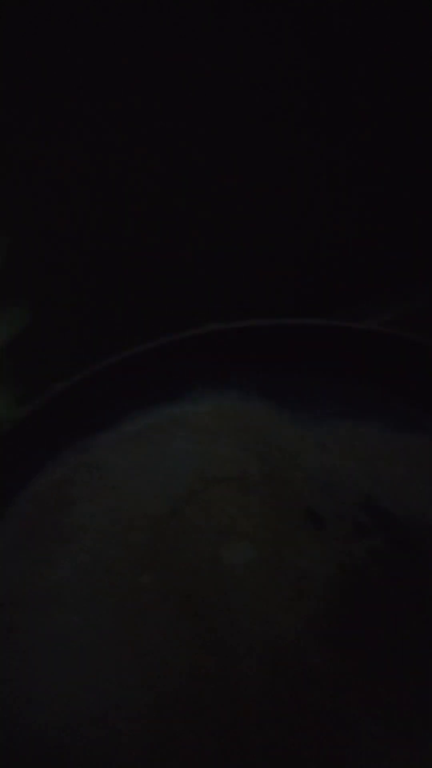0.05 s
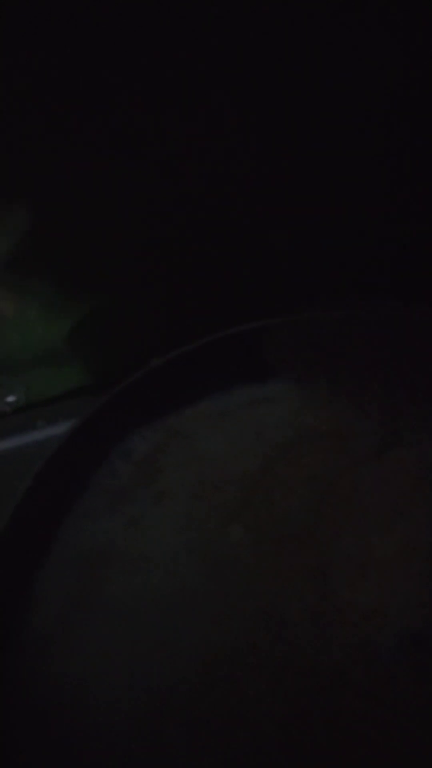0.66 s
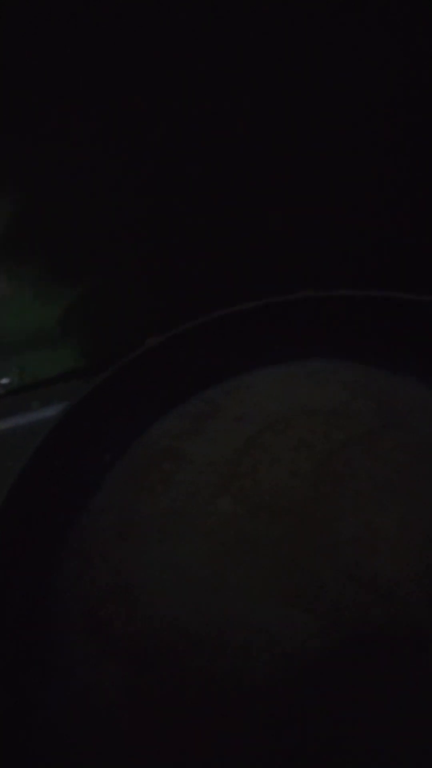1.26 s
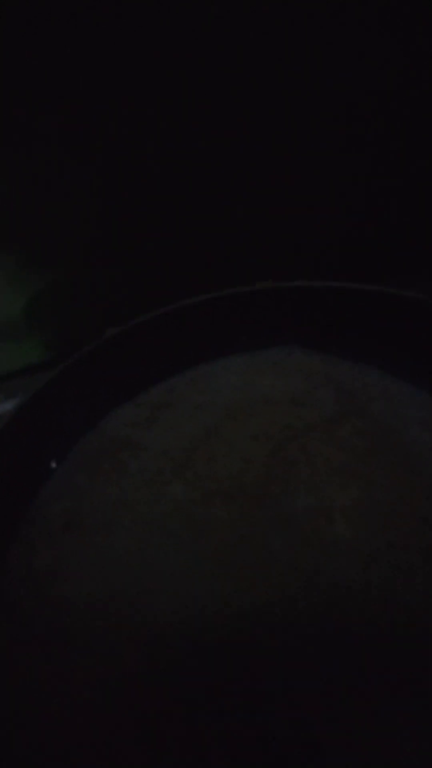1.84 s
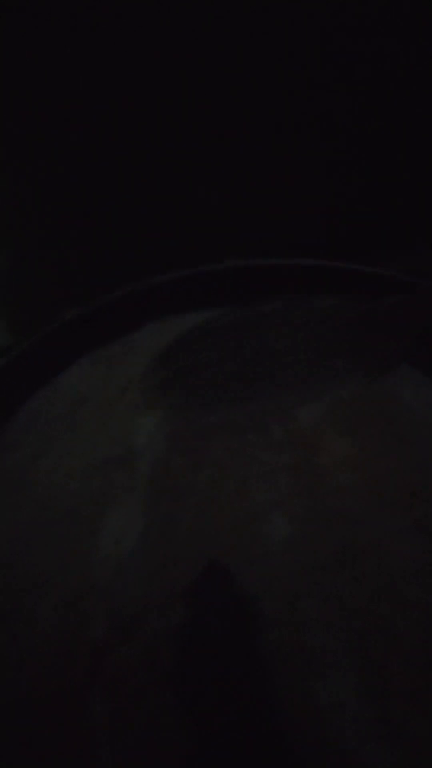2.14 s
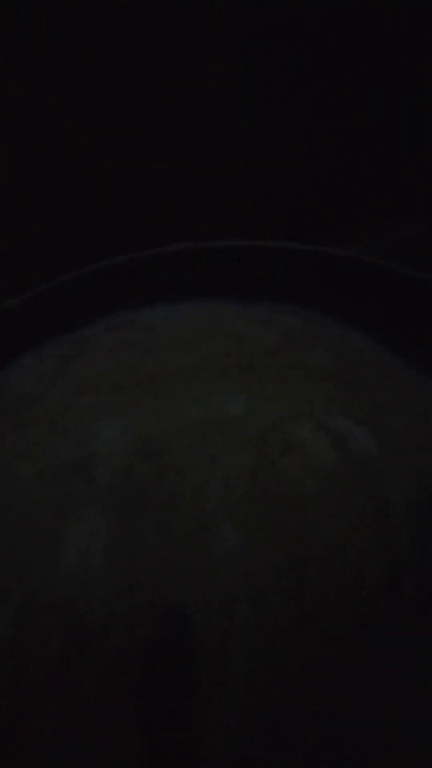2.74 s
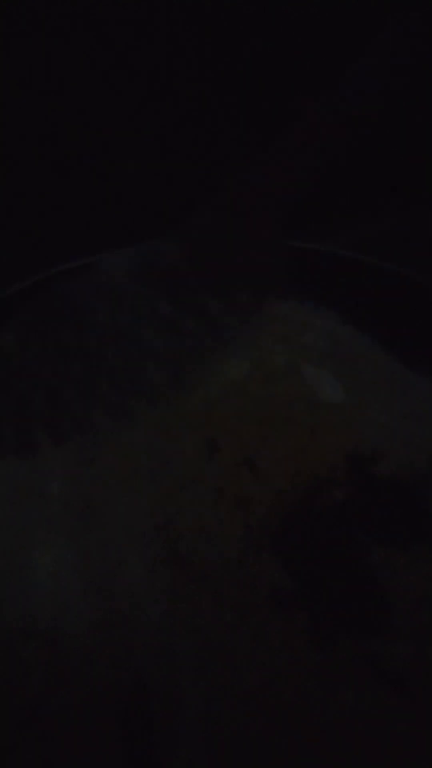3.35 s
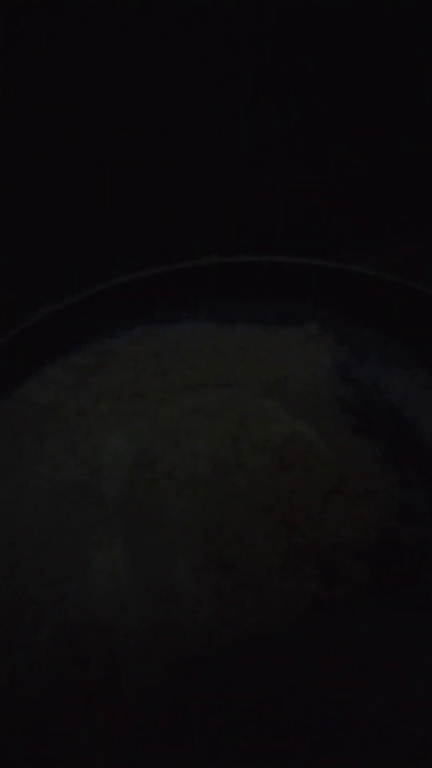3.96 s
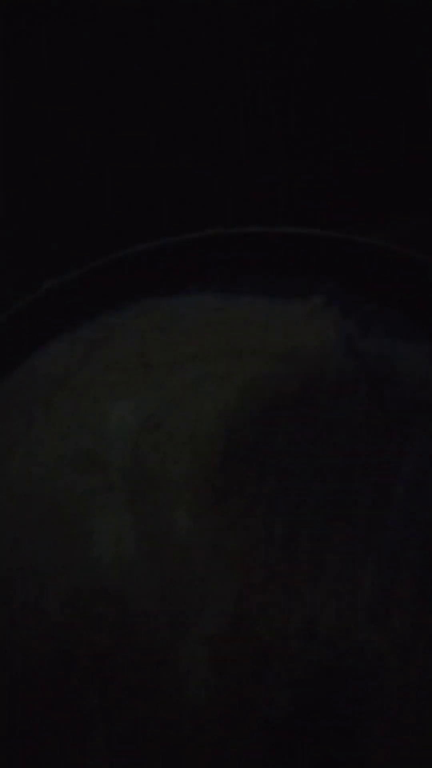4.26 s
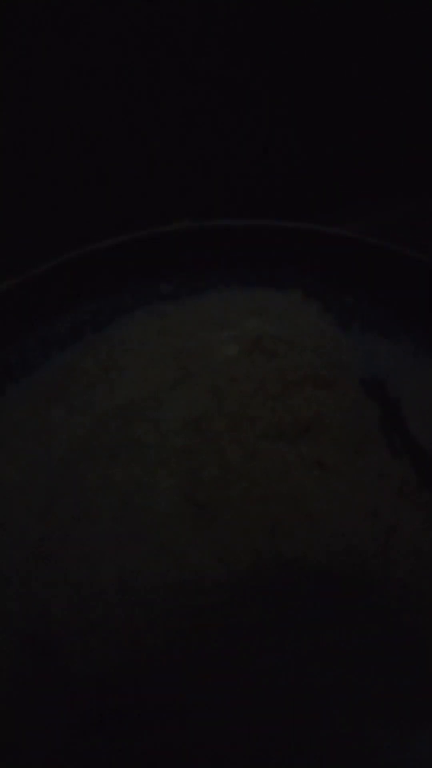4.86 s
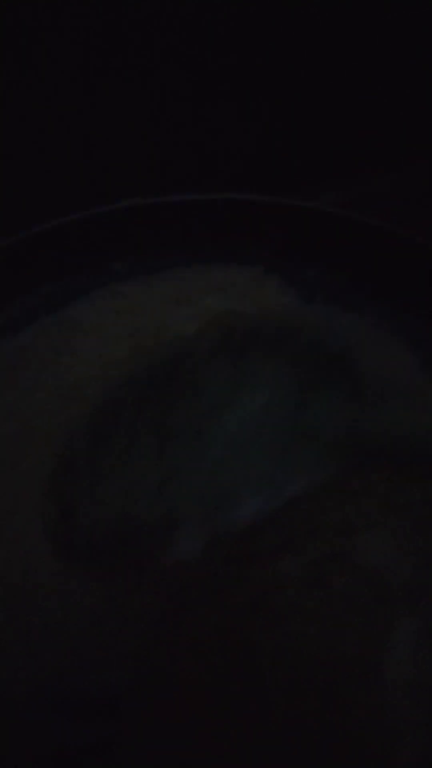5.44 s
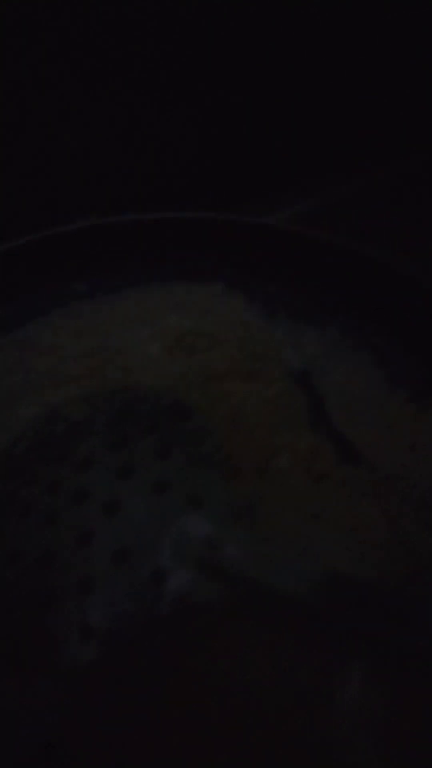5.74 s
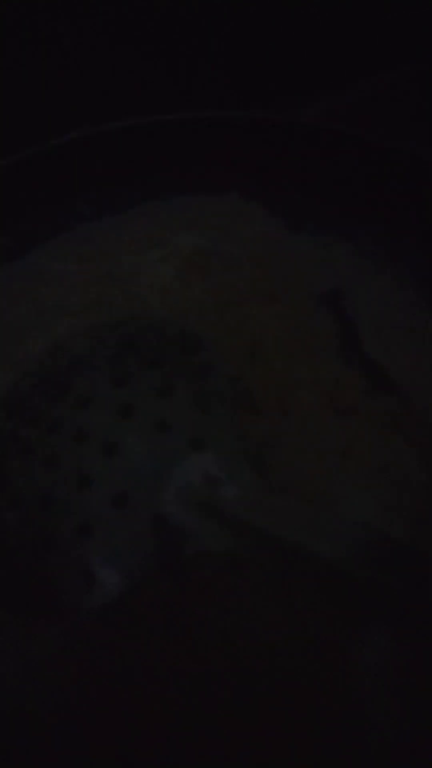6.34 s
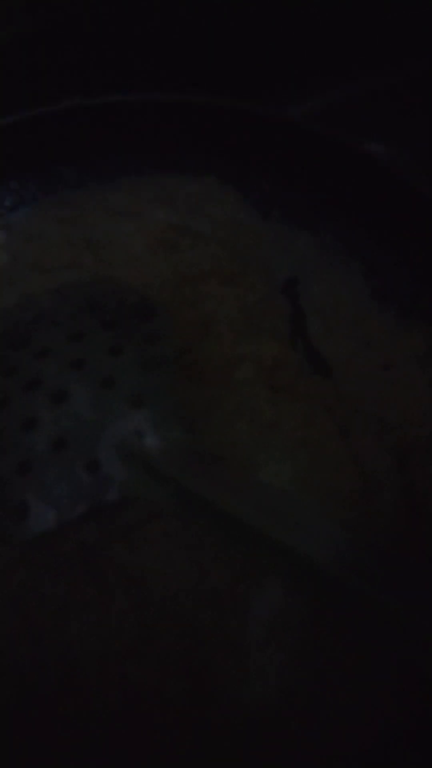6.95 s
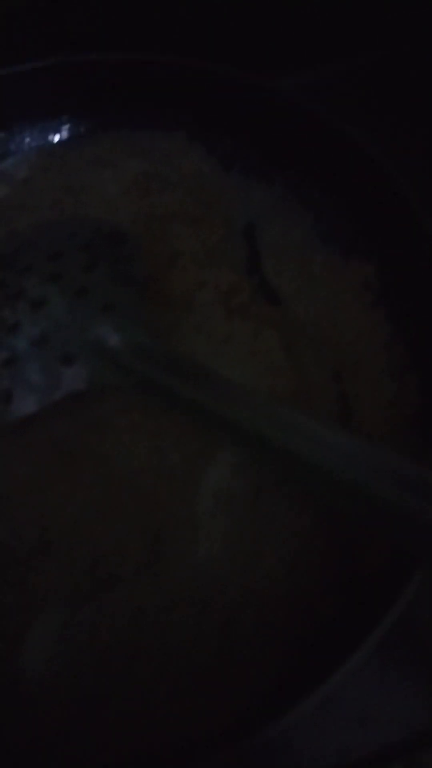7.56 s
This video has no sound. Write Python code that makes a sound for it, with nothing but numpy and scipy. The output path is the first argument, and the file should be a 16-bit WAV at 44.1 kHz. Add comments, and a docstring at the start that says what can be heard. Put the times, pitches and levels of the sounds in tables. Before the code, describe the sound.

Wet mash sizzles in a hot, heavy pan as a metal ladle knocks and scrapes through it, making the pan ring briefly. The hiss flares up several times as the mash is turned, and the pan now and then rumbles on the stove. Near the end a few drops spit, the stirring stops and the sizzle thins to a faint crackle. Heard from close by in a small kitchen.

```python
"""Milk poured onto roasted grain sizzles in a hot, heavy pan in a small kitchen, heard from close by.
From the start a metal ladle knocks and scrapes through the mash, setting the pan ringing, and now and
then the pushed pan rumbles on the stove. Five times in the first five seconds, wet mash is turned onto
hot metal and the sizzle of bursting bubbles flares up. Then the milk soaks in, a few drops spit,
the stirring dies down and the sizzle thins to a crackle."""
import sys
import numpy as np
from scipy import signal
from scipy.fft import rfft, irfft, next_fast_len
from scipy.io import wavfile
from scipy.ndimage import uniform_filter1d, map_coordinates

SR = 44100
rng = np.random.default_rng(int(sys.argv[2]) if len(sys.argv) > 2 else 0)


def digitize_waveform(pressure):
    """Quantize a signal to 16-bit integers and store it at the path in sys.argv[1].

    Rows of a 2-D input are taken as channels; values are limited to [-1, 1].
    """
    field = np.atleast_2d(pressure).T
    bounded = np.clip(field, -1, 1)
    quanta = np.round(bounded * 32767).astype(np.int16)
    wavfile.write(sys.argv[1], SR, quanta)


N = 339570
TIME = np.arange(N) / SR


def from_db(db):
    """Turn decibels into a number to multiply by."""
    return 10 ** (np.asarray(db) / 20)


def unit_power(x):
    """Scale a signal to an average power of 1."""
    return x / np.sqrt(np.mean(x ** 2) + 1e-20)


def fade(t, t60):
    """A dying curve; t60, the ring time, is the seconds it takes to fall by 60 dB."""
    return from_db(-60 * t / t60)


def clicks(times, heights):
    """One click at each of the given times."""
    return np.bincount(np.clip(np.round(times * SR).astype(int), 0, N - 1), heights, N)


def drift(turns_per_s):
    """A random wobble, about 1 in size."""
    points = rng.standard_normal(2048)
    return unit_power(map_coordinates(points, [TIME * turns_per_s], order=1, mode="wrap"))


def colour(x, spectrum):
    """Give a sound the tone colour set out in rows of frequency and level."""
    size = next_fast_len(N + 8192)
    hz, db = np.transpose(spectrum)
    log_hz = np.log(np.fft.rfftfreq(size, 1 / SR) + 1)
    gain = unit_power(from_db(np.interp(log_hz, np.log(hz), db)))
    # folding the cepstrum makes the filter ring only after a click, never before it
    cepstrum = irfft(np.log(gain), size)
    cepstrum[1:size // 2] *= 2
    cepstrum[size // 2 + 1:] = 0
    return irfft(rfft(x, size) * np.exp(rfft(cepstrum)), size)[:N]


def ring(x, hz, t60):
    """Each click in x sets one fading tone ringing."""
    decay, step = fade(1 / SR, t60), 2 * np.pi * hz / SR
    return signal.lfilter([.5, 0, -.5], [1, -2 * decay * np.cos(step), decay ** 2], x + 1e-18)


def crackle(per_s, spread_db):
    """Random clicks of uneven size, with the same power whether few or many."""
    chance = np.clip(per_s / SR, 1e-5, 1)
    sizes = from_db(spread_db * np.minimum(rng.exponential(1, N), 5))
    signs = rng.choice([-1, 1], N)
    return unit_power(sizes * signs * (rng.random(N) < chance) / np.sqrt(chance))


def burst(t60):
    """A short, dying puff of noise with a total energy of 1."""
    t = TIME[:SR // 10]
    noise = rng.standard_normal(len(t)) * fade(t, t60)
    return noise / np.linalg.norm(noise)


# The tone colour of the quiet kitchen. Each row: frequency in Hz, relative level in dB.
HUM_COLOUR = [(30, -9), (65, -26), (85, 6), (110, 5), (140, 6.5), (230, -1), (600, -7), (1500, -1.5),
              (3000, -11), (12000, -29)]

def room_hum(level_db=-58.0):
    """A faint, low, steady noise lies under everything."""
    return from_db(level_db) * colour(rng.standard_normal(N), HUM_COLOUR)


def kitchen_echo(x, echo_db=-6.5, t60=0.36, first_wall_s=0.0033, dull_hz=4500):
    """Hard walls close by add a dense, dulled echo to a sound."""
    t = TIME[:SR]
    tail = rng.standard_normal(SR) * fade(t, t60) * (t > first_wall_s)
    tail = signal.sosfilt(signal.butter(1, dull_hz, fs=SR, output="sos"), tail / np.linalg.norm(tail))
    return x + from_db(echo_db) * signal.oaconvolve(x, tail)[:N]


# The deep tones of the pan on its stand. Each row: pitch in Hz, relative level in dB, ring time in seconds.
STAND_TONES = [(85.8, -7, 0.13), (102.7, -2, 0.4), (154.5, -3.5, 0.27), (185.2, -8, 0.16),
               (201, -3.5, 0.71)]
# The pan shakes. Each row: start in seconds, length in seconds, relative level of the first bump in dB.
JUDDERS = [(1.238, .02, -42), (1.396, .17, -30.5), (2.412, .04, -49), (3.15, .13, -37.5),
           (5.561, .02, -45.5), (5.765, .04, -48)]

def pan_rumble(level_db=-4.0, bumps_per_s=34, fade_db_per_s=46, uneven=0.175, band_hz=(60, 300)):
    """Pushed by the ladle, the pan judders on its stand in a fading run of soft, low bumps."""
    bumps = np.zeros(N)
    for s, length, db in JUDDERS:
        gaps = np.exp(uneven * rng.standard_normal(12)) / bumps_per_s
        age = np.cumsum(gaps) - gaps[0]
        bumps += clicks(s + age, (age < length) * from_db(db + level_db - fade_db_per_s * age))
    push = signal.sosfilt(signal.butter(2, band_hz, "band", fs=SR, output="sos"), bumps)
    return sum(from_db(db) * ring(push, hz, t60) for hz, db, t60 in STAND_TONES)


# The ladle hits the pan. Each row: start in seconds, relative levels in dB of the low tones,
# the high tones and the metal tick, then the favoured pitch in Hz.
KNOCKS = [(.212, -36.5, -38, -65, 436), (.464, -18.5, -17.5, -35.5, 1330), (.809, -17, -18, -29.5, 574),
          (.816, -30, -22.5, -53, 1460), (1.232, -24, -19.5, -40, 780), (1.786, -28.5, -42, -58, 360),
          (1.889, -64, -30.5, -44, 2423), (2.213, -22.5, -24, -39.5, 1254), (2.427, -28, -35, -40.5, 1170),
          (2.485, -29, -28, -43, 1570), (2.564, -25, -27.5, -67, 1266), (3.302, -24, -27, -54, 1270),
          (3.619, -19.5, -18, -35.5, 1226), (3.877, -27.5, -26.5, -58, 574), (4.201, -24, -25, -34, 1640),
          (4.611, -19, -17.5, -37.5, 1410), (4.766, -30, -28.5, -62, 562), (4.86, -45, -37, -59, 1490),
          (5.559, -20, -16.5, -27, 1107), (5.751, -31, -23, -29, 1503), (5.788, -26, -31.5, -62, 1390),
          (7.538, -66, -50.5, -73, 1410)]
# The pan rocks on its stand with a dull bump. Each row: start in seconds, relative level in dB.
ROCKS = [(5.077, -31.5), (5.243, -45), (5.771, -26.5), (5.859, -29.5), (5.915, -33), (6.009, -40),
         (6.087, -40.5)]

def touches(rock_hz=510, bounce_s=0.054, bounce_db=-16.5):
    """List the ladle's knocks, one soft bounce after each, and the pan's rocks, in rows like KNOCKS."""
    rocks = [(s, db, db - 9, db - 29, rock_hz) for s, db in ROCKS]   # mostly low tones
    bounces = [(s + bounce_s, low + bounce_db, high + bounce_db, tick - 39, hz)   # hardly any tick
               for s, low, high, tick, hz in KNOCKS]
    return list(KNOCKS) + rocks + bounces


def favour(hz, favoured_hz, cut_db, octaves):
    """The spot that is touched drives tones near one pitch fully, and the others up to cut_db less."""
    nearness = np.exp(-.5 * (np.log2(hz / favoured_hz) / octaves) ** 2)
    return from_db(cut_db * (nearness - 1))


# The tones of the filled pan. Each row: pitch in Hz, relative level in dB, ring time in seconds.
PAN_TONES = [(316, -2, 0.037), (360, -1, 0.12), (468.6, -2, 0.1), (510, 2, 0.053), (571, -0.5, 0.093),
             (659.6, -8.5, 0.3), (751.7, -6.5, 0.17), (846, -10.5, 0.14), (1079, -4.5, 0.095),
             (1184, -7.5, 0.11), (1281, -1, 0.047), (1380, 5.5, 0.023), (1378, 0, 0.036), (1538, -9, 0.069),
             (1580, 0, 0.041), (1702, -4, 0.031), (1828, -2, 0.032), (2170, -13, 0.036), (2420, -13, 0.051),
             (2900, -12, 0.042), (3656, -12, 0.067)]
LOW_TONES_BELOW_HZ = 930   # low tones come from the pan's bottom, high ones from its wall
# The tone colour of metal ticking on metal. Each row: frequency in Hz, relative level in dB.
TICK_COLOUR = [(600, 1), (1500, 3), (2800, 9), (4300, -3.5), (5600, -3), (7200, 2), (9000, 8),
               (11500, -2.5), (16000, -14)]

def pan_knocks(low_db=-1.5, high_db=-2.5, tick_db=26.0, vary_db=2.5, detune=0.042, dull_hz=3600):
    """Each touch lands on a new spot and rings the pan a little differently; bare metal adds a tick."""
    hz, db, t60 = np.transpose(PAN_TONES)[:, :, None]
    is_low = hz < LOW_TONES_BELOW_HZ
    # neighbouring low tones swing against each other, so the ring swells without a thud
    side = np.where(is_low, (-1) ** np.arange(len(hz))[:, None], 1)
    t, ringing = TIME[:SR // 5], np.zeros(N + SR)
    for s, low, high, _, favoured_hz in touches():
        level_luck, pitch_luck, phase_luck = rng.standard_normal((3, len(hz), 1))
        force_db = np.where(is_low, low + low_db, high + high_db)
        height = from_db(force_db + db + vary_db * level_luck)
        height *= favour(hz, favoured_hz, cut_db=6.0, octaves=0.22)
        swing = side * np.sin(2 * np.pi * hz * (1 + detune * pitch_luck) * t + .5 * phase_luck)
        start = int((s + 0.001028) * SR)   # the heavy wall answers just after the tick
        ringing[start:start + len(t)] += np.sum(height * swing * fade(t, t60), axis=0)
    body = signal.sosfilt(signal.butter(2, dull_hz, fs=SR, output="sos"), ringing[:N])
    starts, _, _, tick, _ = np.transpose(touches())
    ticks = signal.oaconvolve(clicks(starts, from_db(tick + tick_db)), burst(t60=0.023))[:N]
    return body + colour(ticks, TICK_COLOUR)


# The tones of the ladle's steel bowl. Each row: pitch in Hz, relative level in dB, ring time in seconds.
LADLE_TONES = [(2190, -5, 0.067), (3460, -8.5, 0.078), (4340, 1.5, 0.031), (5060, -30, 0.01)]

def ladle_ring(clink_db=-0.5, vary_db=2.0, detune=0.063, song_db=2.5, song_t60=0.041):
    """The bowl clinks differently at each touch and, pressed to the pan, sings at the favoured pitch."""
    hz, db, t60 = np.transpose(LADLE_TONES)[:, :, None]
    t, ringing = TIME[:SR // 5], np.zeros(N + SR)
    for s, low, high, tick, favoured_hz in touches():
        pitch_luck, level_luck = rng.standard_normal((2, len(hz), 1))
        swing = np.sin(2 * np.pi * hz * (1 + detune * pitch_luck) * t) * fade(t, t60)
        clink = np.sum(from_db(tick + clink_db + db + vary_db * level_luck) * swing, axis=0)
        swell = (1 - np.exp(-t * favoured_hz)) * fade(t, song_t60)   # builds up over about one swing
        song = from_db(max(low, high) + song_db) * swell * np.sin(2 * np.pi * favoured_hz * t)
        start = int(s * SR)
        ringing[start:start + len(t)] += clink + song
    return ringing[:N]


# The ladle is dragged through the mash. Each row: start in seconds, length in seconds, relative levels
# in dB of the low and the high tones, grit compared with the high tones in dB, swell over the stroke
# in dB, first and last favoured pitch in Hz.
STROKES = [(0, .11, -49.5, -54.5, -10, -7, 1160, 1790), (0.151, 0.043, -50.5, -39, -12, -3, 1420, 1550),
           (.84, .18, -42.5, -38, -13, 2, 1250, 1090), (1.057, 0.19, -40, -45, -12, -8.5, 1240, 1320),
           (1.786, 0.074, -41.5, -35, -16, -3, 990, 1190), (1.872, 0.045, -55, -37.5, -5.5, 5, 1900, 2630),
           (2.297, 0.15, -39.5, -41, -11, 14, 1560, 1130),
           (3.064, 0.079, -38.5, -35.5, -27, 5.5, 1120, 1140),
           (3.151, 0.086, -42.5, -30.5, -12, 7, 1310, 1500), (3.662, .17, -40, -38.5, -7, 6, 1290, 1150),
           (4.767, 0.13, -49.5, -44, -12.5, 3, 1407, 1400), (5.102, 0.25, -54, -62, -14, -9, 1294, 1500),
           (5.917, 0.087, -46, -53.5, -16, -19, 1360, 1580), (7.162, 0.057, -59, -58, -9, -6, 1314, 1420)]

def stroke_motion(attack_s=0.016, release_s=0.012):
    """In each stroke the hand presses down, changes pressure and pitch evenly, then lets go."""
    forces, pitch_path = 0, []
    for s, length, low_db, high_db, grit_db, swell_db, first_hz, last_hz in STROKES:
        end = s + length
        press = np.clip(1 + (TIME - s) / attack_s, 0, 1)
        let_go = np.exp(-np.clip((TIME - end) / release_s, 0, 20))
        progress = np.clip((TIME - s) / length, 0, 1)
        pressure = press * let_go * from_db(swell_db * (progress - .5))
        forces = forces + np.outer(from_db([low_db, high_db, high_db + grit_db]), pressure)
        pitch_path += [(s, first_hz), (end, last_hz)]
    return forces, np.interp(TIME, *np.transpose(sorted(pitch_path)))


def ladle_scrapes(low_db=0.5, slips_per_s=1600, catches_per_s=250, spread_db=3.5, judder_db=4.0):
    """The ladle sticks and slips over the grain, ringing the pan; its travel moves the pitch."""
    (low_force, high_force, grit_force), favoured_hz = stroke_motion()
    slips = crackle(slips_per_s, spread_db)
    slips /= np.sqrt(uniform_filter1d(slips ** 2, size=SR // 40) + 1e-9)   # the hand evens out the force
    slips *= from_db(judder_db * np.tanh(drift(60)))
    bottom, wall = 0, 0
    for k, (hz, db, t60) in enumerate(PAN_TONES):
        damped = ring(slips, hz, t60 * 0.45)   # the pressing ladle shortens the ring
        tone = from_db(db) * (-1) ** k * unit_power(damped)
        if hz < LOW_TONES_BELOW_HZ:
            bottom += tone
        else:
            wall += tone * favour(hz, favoured_hz, cut_db=8.5, octaves=0.31)
    grit = grit_force * colour(crackle(catches_per_s, spread_db), TICK_COLOUR)   # the edge catches metal
    return low_force * from_db(low_db) * unit_power(bottom) + high_force * unit_power(wall) + grit


# Single drops spit. Each row: start in seconds, relative level in dB.
SPITS = [(5.431, -27), (6.061, -31), (6.162, -34), (6.191, -35), (6.513, -37)]
# The tone colour of spray, the broad hiss in spits and sizzle. Each row: frequency in Hz, relative dB.
SPRAY_COLOUR = [(2500, 0), (4800, -1), (6300, 2.5), (7000, 5), (8500, 10), (10800, 7.5), (12300, 2),
                (14700, 1.5), (16000, -3)]

def spits(boost_db=11):
    """Single drops crack faintly on the drying wall of the pan."""
    starts, db = np.transpose(SPITS)
    cracks = signal.oaconvolve(clicks(starts, from_db(db + boost_db)), burst(t60=0.003))[:N]
    return colour(cracks, SPRAY_COLOUR)


# Steady frying, as mash reaches the metal and dries. Each row: time in seconds, relative fizz level in dB.
SIMMER = [(0, -50.5), (.45, -51.5), (.85, -42.5), (1.15, -46), (1.35, -40.5), (1.7, -43), (2.05, -48),
          (2.87, -53), (3.1, -38), (3.6, -44), (4.1, -42), (4.8, -48.5), (6.05, -51.5), (7.7, -62.5)]
# Wet mash lands on hot metal. Each row: start in seconds, rise time in seconds, then the relative
# peak levels in dB of the fizz, the spray and the boil.
FLARES = [(.23, 0.13, -43.5, -58.5, -53.5), (.485, 0.032, -33, -42.5, -47), (1.72, 0.054, -43.5, -51, -46),
          (2.898, 0.027, -35.5, -44, -38), (4.88, 0.14, -45, -54, -49.5)]

def frying_strength(spray_offset_db=-12.5, boil_follows=0.82, fade_db_per_s=49):
    """Thin fizz, broad spray and coarse boil all follow the simmer; each flare adds to them and fades."""
    simmer_db = np.interp(TIME, *np.transpose(SIMMER))
    usual_simmer_db, usual_boil_db = -47.5, -53.5
    boil_db = usual_boil_db + boil_follows * (simmer_db - usual_simmer_db)
    power = from_db([simmer_db, simmer_db + spray_offset_db, boil_db]) ** 2
    for s, rise_s, *peaks_db in FLARES:
        rise = np.clip((TIME - s) / rise_s, 0, 1)
        age = np.maximum(TIME - s - rise_s, 0)
        for layer, peak_db in enumerate(peaks_db):
            power[layer] += (rise * from_db(peak_db - fade_db_per_s * age)) ** 2
    return np.sqrt(power)


# The path of the fizz's strongest pitch. Each row: time in seconds, pitch in Hz.
FIZZ_PATH = [(0, 9170), (1.55, 8920), (2.15, 9210), (3.2, 8770), (4.3, 9370), (5.9, 9290), (7.7, 8980)]

def wander(fizz, resting_hz=8987):
    """The pitch of the fizz slides up and down as it is played a little faster or slower."""
    speed = np.interp(TIME, *np.transpose(FIZZ_PATH)) / resting_hz
    return map_coordinates(fizz, [np.cumsum(speed)], order=3, mode="mirror")


# The tone colours of the thin, high fizz and of the coarse boil in the mash.
# Each row: frequency in Hz, relative level in dB.
FIZZ_COLOUR = [(5000, -42), (7200, -16), (8000, -3.5), (8600, 6.5), (8950, 8), (9500, 4.5), (11000, -5.5),
               (12000, -40), (15500, -42)]
BOIL_COLOUR = [(150, -26), (330, 3), (560, -3), (920, 3.5), (1300, 4.5), (1850, 6), (2300, 1), (2850, 4.5),
               (3150, -1), (3570, 7), (3900, -1), (4350, 2.5), (5000, -8), (9000, -55)]

def sizzle(fizz_db=-1.0, spray_db=9.0, boil_db=1.0, flicker_db=1.0, steam=0.55):
    """Tiny bubbles burst on the hot metal; the weaker the frying, the fewer and more distinct they are."""
    fizz, spray, boil = frying_strength()
    pops_per_s = 9000 * fizz / from_db(-45)   # 9000 a second when the fizz strength is -45 dB

    def bubbles(spectrum):
        """Pops over escaping steam, for one range of bubble sizes."""
        pops = unit_power(crackle(pops_per_s, spread_db=3.5) + steam * rng.standard_normal(N))
        return from_db(flicker_db * drift(70)) * colour(pops, spectrum)

    return (fizz * from_db(fizz_db) * wander(bubbles(FIZZ_COLOUR))
            + spray * from_db(spray_db) * bubbles(SPRAY_COLOUR)
            + boil * from_db(boil_db) * bubbles(BOIL_COLOUR))


def scene(bass_cut_hz=205):
    """Stirring and sizzling over the low hum of the kitchen, the same in both ears."""
    too_small_for_bass = signal.butter(4, bass_cut_hz, "high", fs=SR, output="sos")
    stirring = signal.sosfilt(too_small_for_bass, pan_knocks() + ladle_ring() + ladle_scrapes())
    mono = room_hum() + kitchen_echo(stirring) + pan_rumble() + sizzle() + spits()
    return np.array([mono, mono])


def record(dry, low_cut_hz=55, high_cut_hz=15700):
    """The microphone drops the deep bass, and the highest treble is cut steeply."""
    thin = signal.sosfilt(signal.butter(2, low_cut_hz, "high", fs=SR, output="sos"), dry)
    return signal.sosfilt(signal.ellip(10, .2, 80, high_cut_hz, fs=SR, output="sos"), thin)


dry = scene()
out = record(dry)
digitize_waveform(out)
```